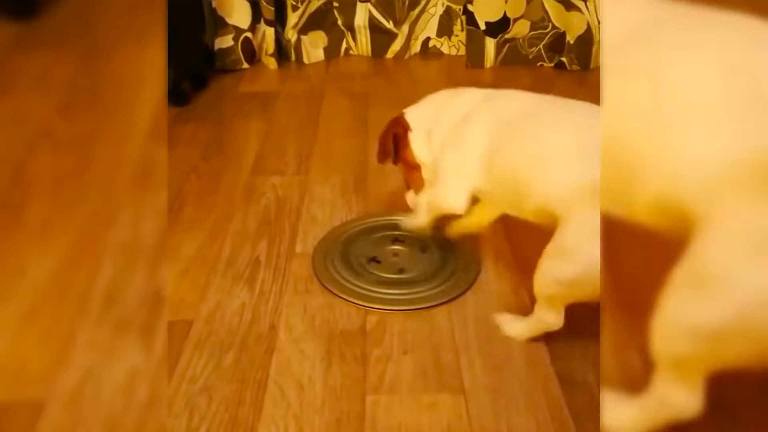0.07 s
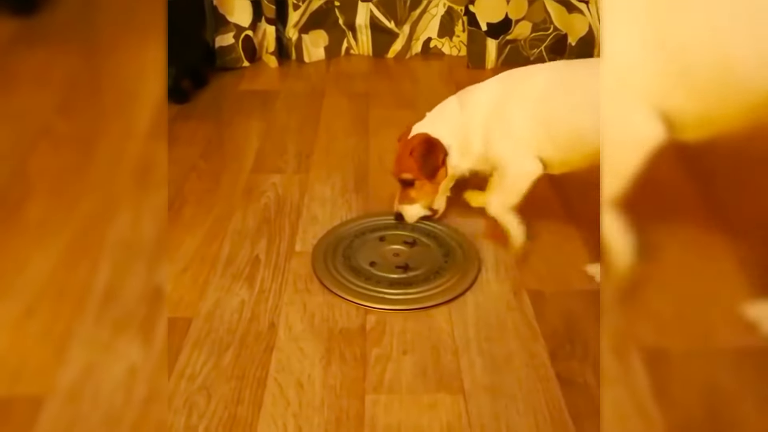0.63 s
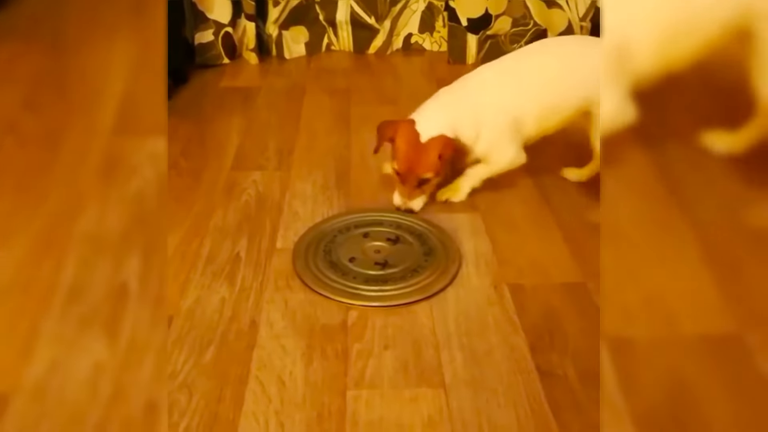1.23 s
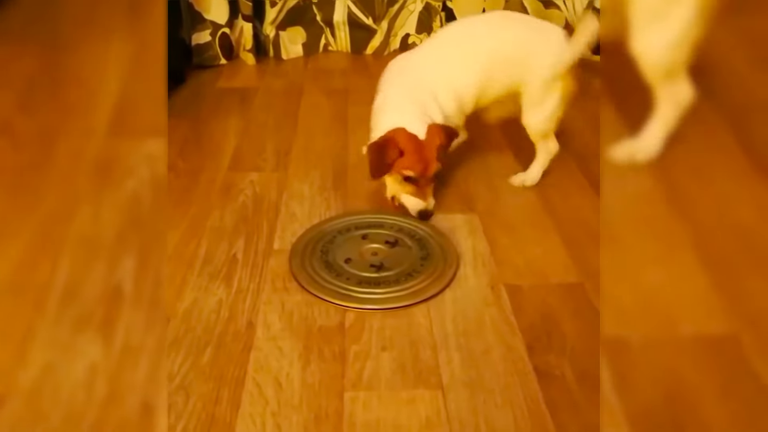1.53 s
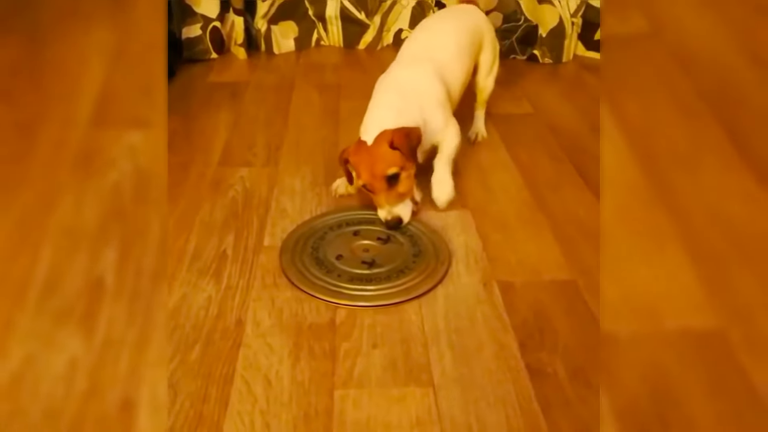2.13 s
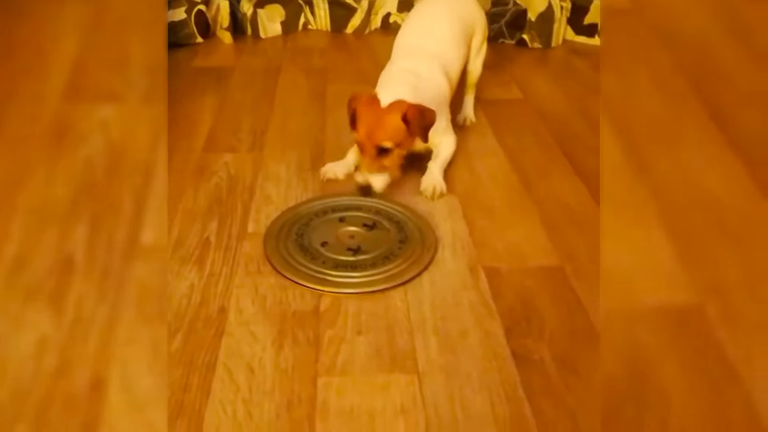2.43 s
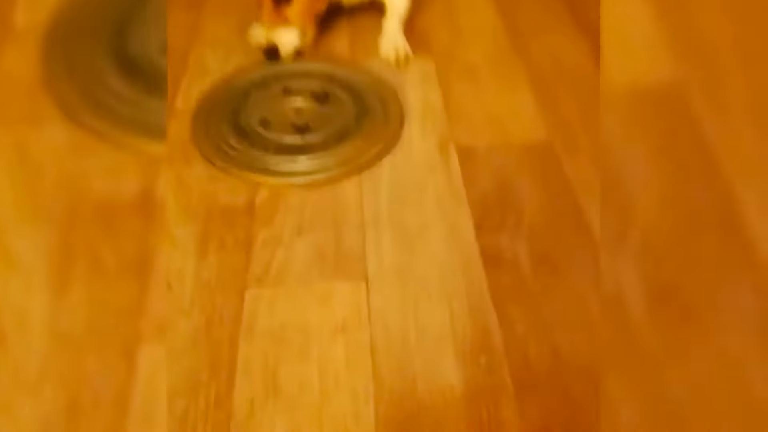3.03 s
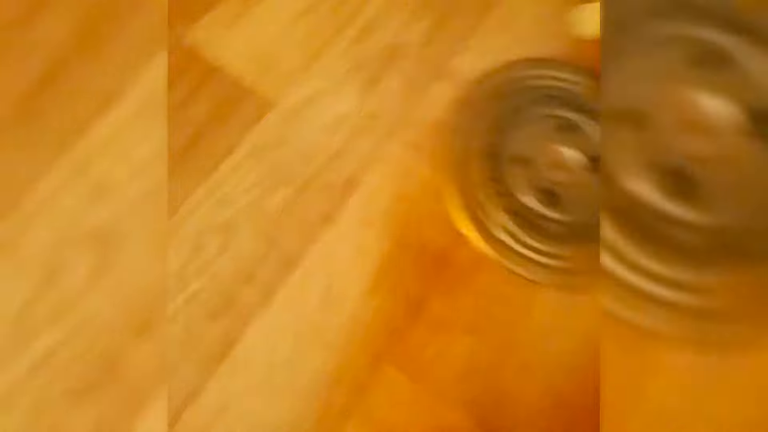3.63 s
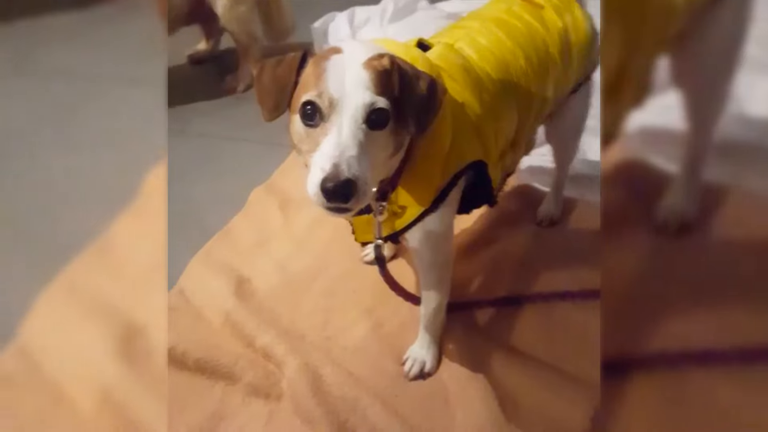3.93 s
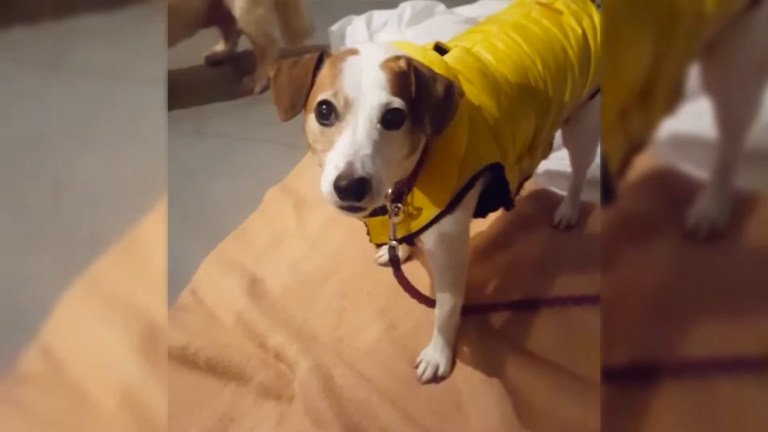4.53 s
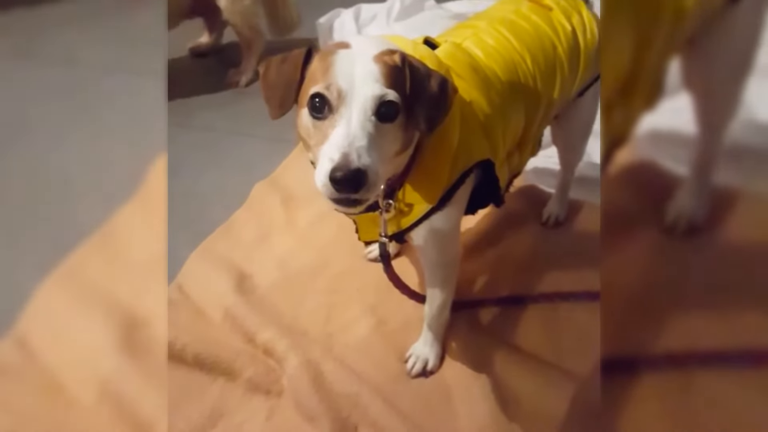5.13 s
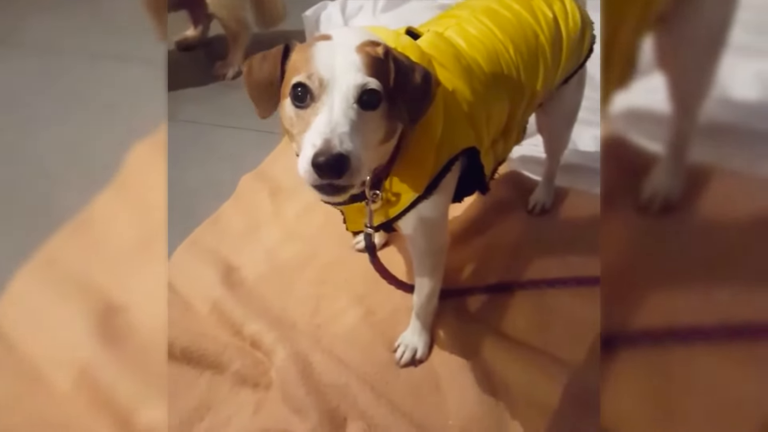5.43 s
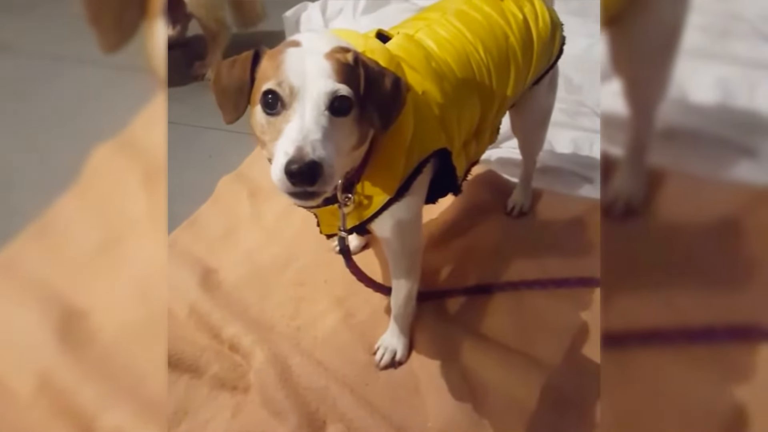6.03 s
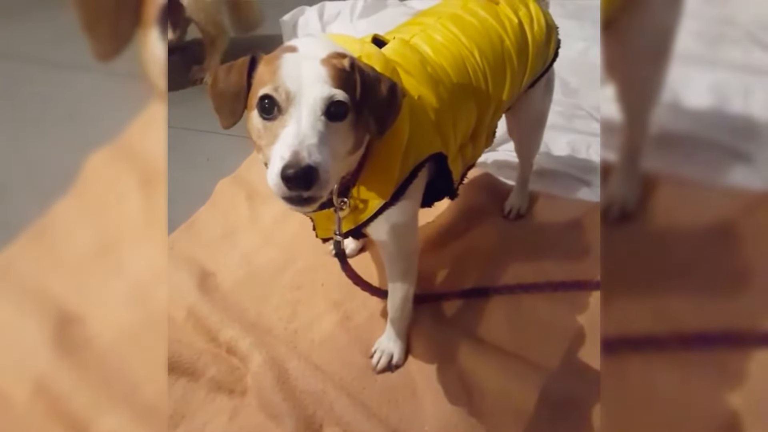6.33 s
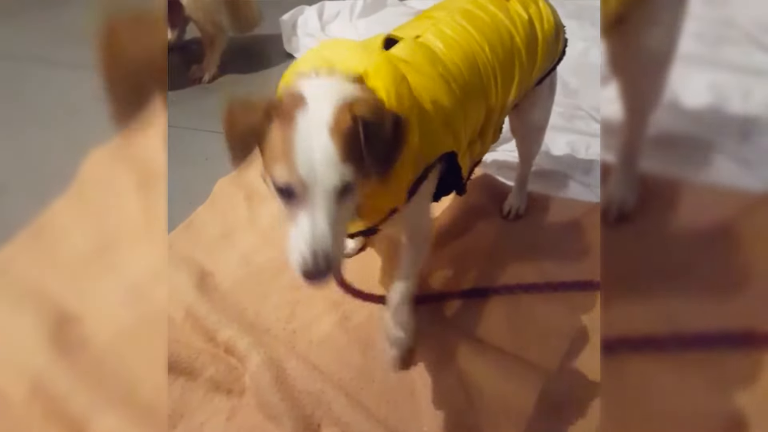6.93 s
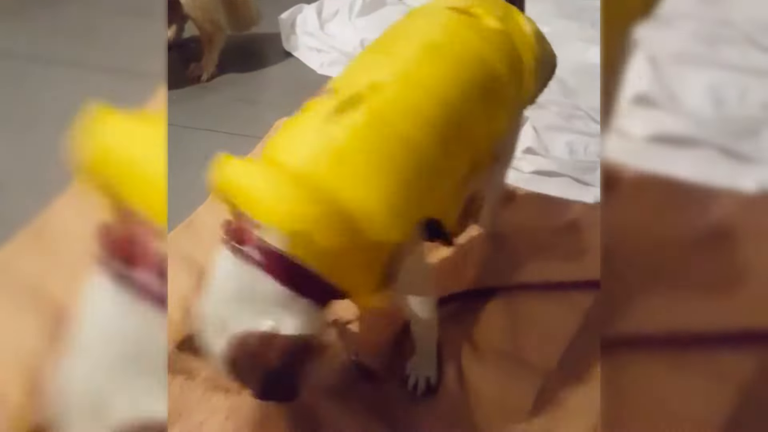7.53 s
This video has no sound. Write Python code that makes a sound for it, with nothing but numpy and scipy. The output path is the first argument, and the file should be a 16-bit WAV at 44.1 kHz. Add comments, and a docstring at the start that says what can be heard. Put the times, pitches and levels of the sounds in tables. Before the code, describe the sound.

In a slightly echoing room, a small dog's claws tick on a hard floor as it growls and gives five sharp, squealing barks. A brief clatter of knocks and a low muttering growl follow. After a short silence, a second dog, close to the microphone and louder, gives one shrill yap, two woofs and a rattling growl, then sneezes, making its metal collar fittings clink.

```python
"""Claws tick on the hard floor of a live room as a terrier circles a metal lid, growling and yapping.
After a short silence a second dog is heard close by: one shrill yap, two woofs, a rattling growl,
then a sneeze that shakes the metal fittings of its collar. Each voice is uneven vocal-fold pulses and
breath ringing in throat and mouth, with a clear note in the barks and the yap. The sneeze is air
bursting through the nose; lid and collar ring as decaying modes."""
import sys
import numpy as np
from scipy import signal
from scipy.fft import rfft, irfft
from scipy.io import wavfile
from scipy.ndimage import uniform_filter1d

SR = 44100
rng = np.random.default_rng(int(sys.argv[2]) if len(sys.argv) > 2 else 0)


def log_audio(samples):
    """Write samples as a 16-bit WAV file to the path given in sys.argv[1]."""
    # one column per channel
    frames = np.atleast_2d(samples).T
    # limit to full scale, then quantise
    limited = np.clip(frames, -1, 1)
    pcm = np.round(limited * 32767).astype(np.int16)
    wavfile.write(sys.argv[1], SR, pcm)


N = 342643
TIME = np.arange(N) / SR
SILENCE_S = 3.8   # the live room falls silent here


def from_db(db):
    """Decibels to gain."""
    return 10 ** (np.asarray(db) / 20)


def unit_power(x):
    """Scale to unit power."""
    return x / np.sqrt(np.mean(x ** 2) + 1e-20)


def follow(rows, t):
    """The columns of a curve table at times t."""
    seconds, *columns = np.transpose(rows)
    return [np.interp(t, seconds, column) for column in columns]


def span(start, end):
    """The sample times from start to end, in seconds."""
    return TIME[int(start * SR):int(end * SR)]


def gate(start, end, t=TIME, fade_s=0.0024):
    """Fade in after start and out before end."""
    return np.clip(np.minimum(t - start, end - t) / fade_s, 0, 1)


def place(x, start):
    """Lay a sound on the timeline."""
    return np.pad(x, (int(start * SR), N))[:N]


def band(x, hz, kind, order=2):
    """Butterworth filter."""
    sections = signal.butter(order, np.clip(hz, 10, .45 * SR), kind, fs=SR, output="sos")
    return signal.sosfilt(sections, x + 1e-18)


def wander(rate_hz, size=N):
    """Smooth random drift of unit power."""
    return unit_power(band(rng.standard_normal(size + SR // 4), rate_hz, "low")[SR // 4:])


def colour(x, spectrum, formants=(), size=4096):
    """Minimum-phase EQ: a broad curve with resonances on top."""
    hz = np.maximum(np.arange(size // 2 + 1) * SR / size, 1)
    points_hz, points_db = np.transpose(spectrum)
    db = np.interp(np.log(hz), np.log(points_hz), points_db)
    for centre, width, peak_db in formants:
        db = db + peak_db / (1 + (2 * (hz - centre) / width) ** 2)
    cepstrum = irfft(np.log(from_db(db)))[:size // 2]
    cepstrum[1:] *= 2
    impulse = irfft(np.exp(rfft(cepstrum, size)))[:size // 2]
    return signal.fftconvolve(x, impulse)[:len(x)]


def noise(spectrum):
    """Coloured noise of unit power."""
    return unit_power(colour(rng.standard_normal(N), spectrum))


def dying_noise(t60):
    """White noise that falls 60 dB in t60 seconds."""
    t = np.arange(int(max(t60, .002) * 1.5 * SR)) / SR
    return rng.standard_normal(len(t)) * from_db(-60 * t / t60)


def clicks(rows):
    """One impulse for each pair of seconds and dB."""
    out = np.zeros(N)
    for start, db in rows:
        out[int(start * SR)] += from_db(db)
    return out


def ring(x, hz, t60):
    """One mode: a click starts a decaying cosine."""
    radius = from_db(-60 / (t60 * SR))
    feedback = radius * np.cos(2 * np.pi * hz / SR)
    return signal.lfilter([1, -feedback], [1, -2 * feedback, radius ** 2], x + 1e-18)


def burst(start, length, db, sag_db_per_s, attack_s=0.00753, release_s=0.018):
    """Envelope of a push of air: quick attack, a hold that sags, release."""
    age = np.maximum(TIME - start, 0)
    edges = np.clip(np.minimum(age / attack_s, (length - age) / release_s + 1), 0, 1)
    return from_db(db - sag_db_per_s * np.minimum(age, length)) * edges


def unsteady_phase(hz, flutter, rate_hz):
    """Phase of a pitch that flutters by a share of itself."""
    return 2 * np.pi * np.cumsum(hz * (1 + flutter * wander(rate_hz, len(hz)))) / SR


def tone(hz, levels_db, flutter):
    """A clear voice; fast flutter frays its upper harmonics."""
    phase = unsteady_phase(hz, flutter, rate_hz=403)
    return np.sqrt(2) * sum(from_db(db) * np.sin(k * phase) for k, db in enumerate(levels_db, 1))


def even(x, pitch, cycles=2.8):
    """Hold the power steady over a few cycles of the lowest pitch."""
    size = int(max(cycles / pitch.min(), .008) * SR)
    power = np.abs(uniform_filter1d(uniform_filter1d(x ** 2, size), size))
    return x / np.sqrt(power + 1e-6 * np.mean(x ** 2))


def vocal_folds(t, pitch, rough, jitter, closure_hz=12000, shimmer_db=6, rasp=1.0, restarts=()):
    """Each closure is a pulse of uneven timing and strength; the folds also chop the breath."""
    cycle = np.cumsum(pitch * np.exp(jitter * rough * wander(220, len(t)))) / SR
    for i in np.searchsorted(t, restarts):   # the folds snap as soon as a catch lets go
        cycle[i:] += np.ceil(cycle[i]) - cycle[i]
    closures = np.interp(np.arange(1, int(cycle[-1])), cycle, np.arange(len(t)))
    at, late = closures.astype(int), closures % 1
    strength = from_db(shimmer_db * rough[at] * rng.standard_normal(len(at))) * np.sqrt(SR / pitch[at])
    pulses = np.bincount(at, strength * (1 - late), len(t))
    pulses += np.bincount(at + 1, strength * late, len(t))
    pulses = band(pulses - np.sqrt(pitch / SR), closure_hz, "low")   # slack folds close softly
    breath = unit_power(np.exp(-3 * (cycle % 1)) * rng.standard_normal(len(t)))
    return band(pulses + rasp * rough * breath, 70, "high")


def voice_bands(x, pitch, throat_db, chest_db, edge_db):
    """Ride three bands of a voice: throat mids, chest hum and open-mouth edge."""
    too_high = np.clip(np.log2(pitch / 460), 0, 1)   # above 460 Hz the voice leaves the chest
    throat = from_db(throat_db) * even(band(x, [500, 1150], "band", order=3), pitch)
    chest = from_db(chest_db - 38 * too_high) * even(band(x, 490, "low", order=6), pitch)
    edge = from_db(edge_db) * even(band(x, 1160, "high", order=7), pitch)
    return throat + chest + edge


def moving_mouth(x, rows, width_hz, lift_db, block=64):
    """Lift resonances that glide as the lips move."""
    out, radius = x.copy(), np.exp(-np.pi * width_hz / SR)
    starts = np.arange(int(rows[0][0] * SR), int(rows[-1][0] * SR), block)
    for track in follow(rows, starts / SR):
        state = np.zeros(2)
        for i, hz in zip(starts, track):
            poles = [1, -2 * radius * np.cos(2 * np.pi * hz / SR), radius ** 2]
            rung, state = signal.lfilter([1, 0, -1], poles, x[i:i + block], zi=state)
            out[i:i + block] += from_db(lift_db) * (1 - radius ** 2) / 2 * rung
    return out


def utter(phrase, effort, shape, formants, throat_db, chest_db, edge_db, chest_follows, edge_follows,
          edge_db_per_octave=0, **texture):
    """One effort drives the throat; chest and edge follow its swing, and edge may rise with pitch."""
    start, end = phrase[0][0], phrase[-1][0]
    t = span(start, end)
    pitch, rough = follow(phrase, t)
    level, = follow(effort, t)
    swing = level - level.mean()
    edge = edge_db + edge_follows * swing + edge_db_per_octave * np.log2(pitch / pitch.mean())
    sound = colour(vocal_folds(t, pitch, rough, **texture), shape, formants)
    sound = voice_bands(sound, pitch, throat_db + swing, chest_db + chest_follows * swing, edge)
    return place(from_db(level.mean()) * sound * gate(start, end, t), start)


# Room tone EQ. Each row: frequency in Hz, gain in dB.
AIR_EQ = [(15, -38), (25, -3.5), (53, -11), (108, -4), (225, -8), (285, -15.5), (342, -14), (1080, -24),
          (1480, -25.5), (3420, -29.5), (13000, -43.5)]
# Its fader ride. Each row: time in seconds, level in dB.
AIR_RIDE = [(0, -80.5), (3.78, -75), (3.83, -110), (4.12, -110), (4.2, -72.5), (4.5, -63), (5.2, -68),
            (5.6, -66.5), (6.8, -63), (7.77, -57.5)]


def room_tone(side_db=-6, hum_hz=103.5, hum_db=2.5):
    """A bed of room air, joined by low mains hum after the silence."""
    hum = from_db(hum_db) * (TIME > SILENCE_S) * np.sin(2 * np.pi * hum_hz * TIME)
    mid = noise(AIR_EQ) + hum
    side = from_db(side_db) * noise(AIR_EQ) * [[1], [-1]]
    return from_db(follow(AIR_RIDE, TIME)[0]) * (mid + side)


# Claw hits. Each row: start in seconds, relative level in dB.
CLAW_HITS = [(0.0184, -24), (0.0354, -21.5), (0.0588, -25.5), (0.1416, -25), (0.177, -26.5),
             (0.3466, -18.5), (0.5242, -24.5), (0.5394, -38), (0.8051, -30)]
# Their EQ. Each row: frequency in Hz, gain in dB.
CLAW_EQ = [(290, -50.5), (500, -23), (732, 7), (1100, -6.5), (1350, -6), (2430, -14.5), (3280, -0.5),
           (5430, 4.5), (13000, -16.5)]


def claws(level_db=8, t60=0.031):
    """Each claw scratches the floor for an instant."""
    scratch = dying_noise(t60)
    steps = signal.fftconvolve(clicks(CLAW_HITS), scratch / np.linalg.norm(scratch))[:N]
    return from_db(level_db) * colour(steps, CLAW_EQ)


# The opening growl. Each row: time in seconds, pitch in Hz, roughness from 0 to 1.
GRUMBLE_PITCH = [(.235, 119.9, 0.67), (.35, 139.3, 0.65), (.45, 114.8, .6), (.63, 104.1, 0.52)]
# The push behind it. Each row: time in seconds, level in dB.
GRUMBLE_EFFORT = [(0.235, -67), (0.267, -47), (0.329, -42.5), (0.521, -58.5), (0.573, -49.5), (0.63, -73)]
# Closed lips, for grumble and mutter. Each row: frequency in Hz, gain in dB.
LIPS_CLOSED = [(53, -68), (90, -19), (179, 2), (334, -4), (476, -22), (736, -2.5), (869, 0.5), (1070, -11),
               (2310, -24.5), (2620, -16.5), (3730, -24), (4990, -21), (6960, -25.5), (9510, -21.5),
               (13000, -32.5)]
# Their resonances. Each row: centre in Hz, width in Hz, gain in dB.
GROWL_FORMANTS = [(225, 160, 4), (840, 94, -2), (1883, 93, 7), (2780, 130, 3), (4200, 410, -4.5),
                  (5100, 620, 4.5)]


def grumble():
    """A low, breathy growl behind closed lips."""
    return utter(GRUMBLE_PITCH, GRUMBLE_EFFORT, LIPS_CLOSED, GROWL_FORMANTS,
                 throat_db=4.5, chest_db=-7, edge_db=-7.5, chest_follows=0.42, edge_follows=0.61,
                 jitter=0.28, shimmer_db=9, rasp=2.2)


# The barks. Each row: start, peak, end and length of the break in seconds; starting, top and end
# pitch in Hz; three mouth resonances and a notch in Hz; throat, chest and edge levels in dB.
BARKS = [(.808, 0.953, 1.025, 0.048, 215.4, 439.3, 230.6, 1900, 3050, 5130, 2450, -29, -52.5, -31),
         (1.063, 1.201, 1.255, 0.064, 215.7, 400.7, 261, 1664, 3390, 4120, 3600, -35, -49.5, -28.5),
         (1.56, 1.652, 1.715, 0.054, 239.3, 452.6, 231, 1760, 2790, 4240, 3680, -31, -53, -32),
         (2.298, 2.386, 2.46, .045, 286, 449.7, 300.3, 1840, 3180, 5090, 4100, -32, -54, -32),
         (2.819, 2.914, 3.0, 0.05, 199.7, 411.7, 319.5, 1674, 2800, 4200, 3960, -36, -50.5, -26)]
# Two mouth shapes for them. Each row: frequency in Hz, gain in dB.
TEETH_BARED = [(71, -66.5), (120, -30), (339, -14), (397, -33), (554, -20), (773, 2.5), (904, 0),
               (1040, -4), (1360, -9), (2300, -14), (2820, -9.5), (3640, -19.5), (5600, -13), (6400, -20),
               (9000, -27.5), (13000, -38)]
LIPS_DRAWN = [(120, -64), (200, -28.5), (455, -36), (754, -15), (963, -24), (1500, -12), (2150, -21),
              (2840, -14), (3700, -20), (4330, -9.5), (5100, -9.5), (5700, -14), (6580, -26),
              (10200, -33.5), (13000, -69)]
SNARL_HZ = 90   # loose throat tissue makes the barks rattle


def bark(row, shape, flip_s=0.007, snarl_db=3, **texture):
    """The pitch climbs as the mouth opens; the voice thins at the break and drops to a hoarse tail."""
    start, peak, end, break_s, start_hz, top_hz, end_hz = row[:7]
    *mouth_hz, notch_hz, throat_db, chest_db, edge_db = row[7:]
    t = span(start, end)
    breaks, drops = peak - break_s / 2, peak + break_s / 2
    climb = np.sin(np.pi / 2 * np.clip((t - start) / (.87 * (breaks - start)), 0, 1))
    squealing = np.clip(np.minimum(t - breaks, drops - t) / flip_s + .5, 0, 1)
    tail = np.interp(t, [drops, end], [0, 1])
    pitch = (start_hz + (top_hz - start_hz) * climb) * (end_hz / top_hz) ** tail
    rough = np.interp(t, [start, (start + breaks) / 2, breaks - 2 * flip_s, breaks, drops],
                      [.5, .13, .13, .45, .65])
    throat = throat_db - 16.5 * (1 - climb) - 13 * squealing - 19 * tail
    # opening jaws let the treble out, lose the chest hum and raise the mouth resonances
    still_shut = np.interp(t, [start, peak - 0.015], [1, 0]) ** 1.15
    closing = np.interp(t, [peak, peak + 0.076], [0, 1])
    edge = edge_db - 39 * still_shut - 19.5 * closing
    chest = chest_db - 13.5 * np.interp(t, [start, breaks, peak, drops + flip_s], [0, 0.42, 1, 0])
    shut_hz = .86 * np.array(mouth_hz)
    jaws = [(0, *shut_hz), (breaks - start, *mouth_hz), (drops - start, *mouth_hz),
            ((len(t) - 1) / SR, *shut_hz)]
    sound = colour(vocal_folds(t, pitch, rough, **texture), shape, [(notch_hz, 380, -17.5)])
    sound = moving_mouth(sound, jaws, width_hz=160, lift_db=12)
    sound = voice_bands(sound, pitch, throat, chest, edge)
    sound *= from_db(snarl_db * wander(SNARL_HZ, len(t)))
    return place(sound * gate(start, end, t, fade_s=0.013), start)


def barks():
    """Four barks through bared teeth, then one with the lips drawn back."""
    bared = sum(bark(row, TEETH_BARED, jitter=.17, shimmer_db=8, rasp=0.64, closure_hz=8900)
                for row in BARKS[:-1])
    return bared + bark(BARKS[-1], LIPS_DRAWN, jitter=.16, shimmer_db=11, rasp=0.52, closure_hz=6500)


# The clear note, one curve a bark. Each row: time in seconds, pitch in Hz, level in dB.
SQUEAL_CURVES = [
    [(.83, 690, -50), (.862, 720, -39), (.885, 870, -31), (.905, 890, -30), (.92, 790, -28),
     (.945, 790, -29), (.96, 740, -40), (.977, 800, -30), (1.025, 700, -41)],
    [(1.085, 690, -46), (1.12, 620, -37), (1.16, 740, -37), (1.178, 812, -37), (1.2, 822, -37),
     (1.215, 680, -38), (1.24, 640, -42)],
    [(1.572, 680, -45), (1.595, 880, -29), (1.622, 905, -25), (1.632, 1170, -30), (1.646, 1390, -25),
     (1.661, 1400, -24), (1.675, 1150, -31), (1.688, 800, -28), (1.712, 660, -38)],
    [(2.3, 590, -45), (2.335, 790, -32), (2.36, 910, -26), (2.372, 1170, -29), (2.39, 1235, -26),
     (2.405, 1120, -36), (2.418, 900, -37), (2.428, 750, -30), (2.455, 640, -42)],
    [(2.83, 620, -43), (2.855, 780, -31), (2.878, 810, -37), (2.89, 1260, -32), (2.91, 1410, -33),
     (2.922, 1650, -22), (2.937, 1180, -30), (2.952, 730, -29), (3.0, 660, -38)],
]
# Its bite at each bark's peak. Each row: harmonics 2, 3 and 4 in dB relative to the note.
SQUEAL_OVERTONES = [(-7.5, -14.5, -12), (11, -14, -3), (-6, -20.5, -18.5), (-7, -22.5, -20.5),
                    (-6.5, -9, -29)]


def squeals(dull_db=15, dull_s=0.054, snarl_db=1.5):
    """The clear note of each bark lunges up, turns shrill at the peak and falls away."""
    out = np.zeros(N)
    for curve, overtones, (_, peak, *_) in zip(SQUEAL_CURVES, SQUEAL_OVERTONES, BARKS):
        start, end = curve[0][0], curve[-1][0]
        t = span(start, end)
        hz, db = follow(curve, t)
        dull = dull_db * np.minimum(((t - peak) / dull_s) ** 2, 1)
        sound = tone(hz, [db] + [db + over - dull for over in overtones], flutter=0.014)
        sound *= from_db(snarl_db * wander(SNARL_HZ, len(t)))
        out += place(sound * gate(start, end, t, fade_s=.005), start)
    return out


def lid(voice):
    """The thin metal faintly takes up one note of the voice and rings on."""
    return from_db(-77) * ring(voice, hz=1640, t60=.75)


# The drone. Each row: time in seconds, pitch in Hz, roughness from 0 to 1.
DRONE_PITCH = [(1.758, 188.6, 0.53), (1.84, 231.5, 0.32), (1.88, 312.8, 0.16), (1.92, 320.9, 0.49),
               (1.96, 235.2, 0.36), (2.1, 236.5, 0.32), (2.15, 221.5, 0.26), (2.22, 246, 0.1),
               (2.27, 262, 0.16), (2.302, 291, 0.12)]
# The push behind it. Each row: time in seconds, level in dB.
DRONE_EFFORT = [(1.758, -59.5), (1.827, -51), (1.886, -34), (1.94, -55), (1.966, -43.5), (2.29, -42.5),
                (2.3, -35)]
# Nasal EQ. Each row: frequency in Hz, gain in dB.
THROUGH_NOSE = [(71, -98), (120, -51), (225, -4), (389, -30), (623, -11.5), (819, -4), (904, -0.5),
                (1060, -8), (1830, -22), (2320, -22.5), (5070, -27), (5930, -39), (13000, -40.5)]
# Nasal resonances. Each row: centre in Hz, width in Hz, gain in dB.
NOSE_FORMANTS = [(980, 170, 5.6), (1830, 93, 14), (3937, 86, 13), (5130, 670, 16.3)]


def drone():
    """Between two barks the voice keeps going through the nose."""
    return utter(DRONE_PITCH, DRONE_EFFORT, THROUGH_NOSE, NOSE_FORMANTS,
                 throat_db=4, chest_db=-11, edge_db=-2.5, chest_follows=0.076, edge_follows=0.54,
                 closure_hz=3980, jitter=.22, shimmer_db=11)


# Dull bumps. Each row: start in seconds, relative level in dB.
MIC_BUMPS = [(2.934, -35), (2.984, -44.5), (3.02, -38.5), (3.198, -45)]


def bumps():
    """Soft bumps on the microphone ring in the low bass."""
    return from_db(-5) * band(ring(clicks(MIC_BUMPS), hz=45, t60=0.16), 260, "low")


# Hard knocks. Each row: start in seconds, peak on the right in dB, brightness in Hz.
KNOCKS = [(3.1877, -29.5, 2900), (3.2029, -33, 2260), (3.2283, -31, 4200), (3.2403, -19.5, 6100),
          (3.2486, -15.5, 2950), (3.2526, -26, 4000), (3.2534, -22, 6500), (3.263, -27.5, 8900),
          (3.266, -27.5, 3000)]
# The scuff's EQ. Each row: frequency in Hz, gain in dB.
SCUFF_EQ = [(200, -6), (1500, -5), (4500, -3), (7200, 2), (8300, -11), (10000, -2), (13000, -5)]


def clatter(left_db=-15, low_cut_hz=120):
    """A run of hard, dry knocks close on the right, ending in a short scuff."""
    scuff = burst(start=3.258, length=.033, db=-43, sag_db_per_s=120, attack_s=0.0019, release_s=0.0058)
    out = scuff * noise(SCUFF_EQ)
    for start, db, hz in KNOCKS:
        knock = band(signal.unit_impulse(SR // 50), hz, "low", order=3)
        knock = band(knock, low_cut_hz, "high")
        out += place(from_db(db) * knock / np.abs(knock).max(), start)
    return from_db([[left_db], [0]]) * out


# The mutter. Each row: time in seconds, pitch in Hz, roughness from 0 to 1.
MUTTER_PITCH = [(3.355, 109.4, 0.55), (3.44, 174.7, 0.49), (3.53, 129.4, 0.59), (3.62, 134.9, 0.67),
                (3.69, 174.5, 0.478), (3.8, 140.9, 0.5)]
# The push behind it. Each row: time in seconds, level in dB.
MUTTER_EFFORT = [(3.354, -63), (3.394, -63), (3.402, -43), (3.448, -42.5), (3.505, -52), (3.55, -49),
                 (3.63, -49), (3.69, -39), (3.74, -49), (3.8, -57)]
# Its mouth sweep. Each row: time in seconds, two resonances in Hz.
MUTTER_MOUTH = [(3.36, 2730, 5260), (3.41, 2660, 3650), (3.45, 1940, 3430), (3.49, 2450, 3380),
                (3.54, 2700, 4540), (3.61, 2760, 4648), (3.68, 2170, 4800), (3.72, 2140, 5840),
                (3.79, 1648, 5150)]


def mutter():
    """A low growl whose resonances slide with the lips."""
    growl = utter(MUTTER_PITCH, MUTTER_EFFORT, LIPS_CLOSED, GROWL_FORMANTS,
                  throat_db=0.5, chest_db=-3, edge_db=-8.5, chest_follows=0.56, edge_follows=0.53,
                  jitter=0.25, shimmer_db=10)
    return moving_mouth(growl, MUTTER_MOUTH, width_hz=200, lift_db=10)


# Small close knocks and mouth clicks. Each row: start in seconds, relative peak in dB, brightness in Hz.
CLOSE_TICKS = [(4.604, -34.5, 1060), (4.625, -25, 1284), (5.307, -41, 1290), (6.54, -24, 819),
               (6.659, -27.5, 1514), (6.878, -44.5, 1350), (6.932, -45, 2190), (7.077, -38.5, 1063),
               (7.228, -40, 1190), (7.277, -45, 5000), (7.369, -47.5, 3610), (7.42, -35.5, 2740)]


def ticks(level_db=-1, crack=5, t60=0.028):
    """A crack and a short dry rattle around one broad resonance."""
    out = np.zeros(N)
    for start, db, hz in CLOSE_TICKS:
        tick = dying_noise(t60)
        tick[0] += crack
        tick = band(tick, [hz / 2.8, hz * 1.1], "band", order=1)
        out += place(from_db(db + level_db) * tick / np.abs(tick).max(), start)
    return out


# A breath in before the yap, then a puff and a nostril hiss as the rattling growl ends.
# Each row: start and length in seconds, level in dB, sag in dB per second.
HUFFS = [(4.621, 0.12, -45, 9), (6.538, 0.12, -44, 50)]
NOSE_HISS = [(6.515, 0.047, -42, 30)]
# Their EQs. Each row: frequency in Hz, gain in dB.
HUFF_EQ = [(240, -33.5), (400, -8), (1640, -6), (2300, -3.5), (4000, -11.5), (4900, -7.5), (5920, -33.5),
           (9860, -18.5), (13000, -32)]
NOSE_HISS_EQ = [(5500, -40), (7200, -7), (8300, -7), (9400, -2), (11500, -6), (12500, -21)]


def huffs(grain_db=3, grain_hz=99):
    """Air flutters through the second dog's muzzle and hisses thinly from the nostrils."""
    puffs = sum(burst(*row) for row in HUFFS) * noise(HUFF_EQ)
    hiss = sum(burst(*row) for row in NOSE_HISS) * noise(NOSE_HISS_EQ)
    return (puffs + hiss) * from_db(grain_db * wander(grain_hz))


# The shrill yap. Each row: time in seconds, pitch in Hz, roughness from 0 to 1.
YAP_PITCH = [(4.789, 1033, 0.27), (4.795, 938, .3), (4.806, 897.3, 0.15), (4.823, 917.7, 0.18),
             (4.832, 879.3, 0.41), (4.839, 836.3, 0.44), (4.844, 727.6, 0.57), (4.851, 617.7, 0.4),
             (4.862, 534, 0.55), (4.873, 465.6, 0.41), (4.884, 422, 0.53), (4.896, 404, 0.5),
             (4.908, 300, 0.71)]
# The push behind it. Each row: time in seconds, level in dB.
YAP_EFFORT = [(4.79, -34), (4.8, -43), (4.827, -37), (4.841, -18), (4.859, -18), (4.88, -17.5),
              (4.894, -20), (4.909, -30)]
# A wide-open mouth. Each row: frequency in Hz, gain in dB.
WIDE_OPEN = [(59, -76), (100, -41.5), (480, -17.5), (736, -15), (884, -5), (1500, -30), (1800, -21),
             (3120, -30), (4510, -37.5), (5640, -59.5), (6600, -60), (7500, -47), (11700, -43),
             (13000, -76.5)]
# Its resonances. Each row: centre in Hz, width in Hz, gain in dB.
YAP_FORMANTS = [(862, 130, 6.5), (1804, 210, 0.8), (2550, 490, 3), (3250, 300, 2), (4040, 294, -12),
                (4580, 300, 5), (4900, 250, -6)]
# The clear core. Each row: time in seconds, level in dB, roll-off in dB per harmonic.
YAP_CORE = [(4.789, -15, 9.2), (4.796, -8.5, 9.7), (4.81, -8, 9), (4.828, -8, 8.6), (4.839, -16.5, 3.4),
            (4.845, -14.5, 8), (4.853, -19, 5), (4.866, -23.5, 6), (4.882, -32.5, 4)]


def yap(harmonics=4):
    """A rough voice around a clear core that holds, turns brassy as it breaks, and plunges."""
    grit = utter(YAP_PITCH, YAP_EFFORT, WIDE_OPEN, YAP_FORMANTS,
                 throat_db=0.5, chest_db=-18.5, edge_db=-4.5, chest_follows=1, edge_follows=1,
                 closure_hz=5530, shimmer_db=3, jitter=0.097)
    grit = signal.lfilter([.64, -1.58, 1], [1, -1.58, .64], grit)   # an all-pass smears each pulse
    start, end = YAP_CORE[0][0], YAP_CORE[-1][0]
    t = span(start, end)
    db, roll_off = follow(YAP_CORE, t)
    pitch, _ = follow(YAP_PITCH, t)
    core = tone(pitch, [db - k * roll_off for k in range(harmonics)], flutter=0.012)
    return grit + place(core * gate(start, end, t), start)


# The two woofs. Each row: time in seconds, pitch in Hz, roughness from 0 to 1.
WOOF_PITCH = [(5.33, 425, 0.9), (5.345, 387, 0.49), (5.37, 450, 0.48), (5.4, 435, 0.37),
              (5.42, 364.3, 0.16), (5.445, 344.3, 0.48), (5.48, 320.4, 0.66)]
DEEP_WOOF_PITCH = [(5.773, 328.6, 0.42), (5.8, 382, 0.66), (5.82, 414, 0.32), (5.85, 392, 0.18),
                   (5.875, 362.7, 0.505), (5.915, 358.5, 1), (5.94, 104, 0.25)]
# The push behind them. Each row: time in seconds, level in dB.
WOOF_EFFORT = [(5.331, -37), (5.34, -25.5), (5.39, -25), (5.408, -30.5), (5.416, -20), (5.428, -19.5),
               (5.48, -38)]
DEEP_WOOF_EFFORT = [(5.773, -33), (5.797, -25.5), (5.806, -15.5), (5.828, -14), (5.842, -16),
                    (5.868, -17.5), (5.894, -22), (5.94, -34)]
# A rounded mouth. Each row: frequency in Hz, gain in dB.
ROUNDED = [(59, -64), (100, -20.5), (307, -18.5), (391, -17.5), (500, -14.5), (798, -3.5), (999, -19),
           (1630, -38.5), (2080, -32), (2650, -40), (2940, -38), (4240, -38), (6500, -54), (7200, -47.5),
           (13000, -50.5)]
# Its resonances. Each row: centre in Hz, width in Hz, gain in dB.
WOOF_FORMANTS = [(347, 53, 5.5), (755, 280, 0.8), (1310, 220, 4), (1737, 95, 6.5), (2060, 190, 6),
                 (2640, 150, -6), (2980, 260, 11.5), (3600, 200, -7.5), (4250, 380, 11.5),
                 (4710, 240, -9.5)]


def woofs():
    """Two woofs through a rounded mouth, the second with more chest."""
    first = utter(WOOF_PITCH, WOOF_EFFORT, ROUNDED, WOOF_FORMANTS,
                  throat_db=-0.4, chest_db=-14, edge_db=-12, chest_follows=0.66, edge_follows=0.75,
                  edge_db_per_octave=37, closure_hz=7000, jitter=0.078, rasp=0.23)
    second = utter(DEEP_WOOF_PITCH, DEEP_WOOF_EFFORT, ROUNDED, WOOF_FORMANTS,
                   throat_db=0, chest_db=-9, edge_db=-14, chest_follows=0.5, edge_follows=1.59,
                   closure_hz=6950, jitter=0.087, rasp=0.58)
    return first + second


def pop(start=5.7307, left_db=6, right_db=-23):
    """One sharp, dry pop on the left with a faint deep tail."""
    punch = ring(clicks([(start, -8.5)]), hz=108, t60=0.026)
    tail = ring(clicks([(start, -38)]), hz=24, t60=0.22)
    return from_db([[left_db], [right_db]]) * band(punch + tail, 3860, "low")


# The rattling growl. Each row: time in seconds, pitch in Hz, roughness from 0 to 1.
RATTLE_PITCH = [(5.93, 105, 0.38), (5.98, 84.2, 0.45), (6.04, 63.86, 0.24), (6.1, 83.7, 0.35),
                (6.3, 90.05, 0.34), (6.38, 116.6, 0.43), (6.5, 118.4, 0.42), (6.56, 110.7, 0.2),
                (6.67, 106.7, 0.093)]
# The push behind it. Each row: time in seconds, level in dB.
RATTLE_EFFORT = [(5.93, -28), (5.96, -40), (6.128, -40.5), (6.3, -35.5), (6.39, -29), (6.47, -30.5),
                 (6.512, -22.5), (6.586, -38.5), (6.638, -40), (6.67, -54)]
# A shut jaw. Each row: frequency in Hz, gain in dB.
JAW_SHUT = [(47, -56), (80, -28), (108, -1), (162, -10), (237, -3), (300, -10), (341, 2.5), (395, -15),
            (469, -11), (521, -26), (749, -9), (1390, -47.5), (7160, -45), (11200, -52), (13000, -52)]
# Its resonances. Each row: centre in Hz, width in Hz, gain in dB.
RATTLE_FORMANTS = [(361, 44, 7.4), (785, 300, 6), (1215, 240, 11.3), (2550, 540, 7.5), (4180, 610, 15.7),
                   (5900, 800, 10.5), (11100, 2300, 6.2)]
# Catches in the throat. Each row: start and end in seconds.
CATCHES = [(6.111, 6.132), (6.164, 6.181), (6.211, 6.222), (6.257, 6.269), (6.305, 6.318)]


def rattling_growl(lips_close_s=6.52, closing_s=0.025, muffled_hz=365):
    """A growl so slow that its pulses stand apart; it catches, then ends behind closed lips."""
    growl = utter(RATTLE_PITCH, RATTLE_EFFORT, JAW_SHUT, RATTLE_FORMANTS,
                  throat_db=-1.5, chest_db=-6.5, edge_db=-18.5, chest_follows=1, edge_follows=0.99,
                  closure_hz=1310, jitter=.13, rasp=1.86, restarts=[end for _, end in CATCHES])
    flow = 1 - sum(gate(start, end) for start, end in CATCHES)
    shut = np.clip((TIME - lips_close_s) / closing_s, 0, 1)
    return flow * ((1 - shut) * growl + shut * band(growl, muffled_hz, "low"))


# Grunts ending the growl and inside the sneeze. Each row: start and length in seconds, level in dB,
# sag in dB per second, starting and end pitch in Hz, relative level of the octave in dB.
GRUNTS = [(6.507, 0.13, -31.5, 36, 113, 106.6, -1.5), (7.446, 0.036, -26.5, 380, 222, 183.5, 2.5),
          (7.559, 0.07, -24.5, 205, 140, 117.7, -5.5)]


def grunts():
    """Voice through the nose: a wobbling, sinking fundamental and its octave."""
    out = np.zeros(N)
    for start, length, db, sag, start_hz, end_hz, octave_db in GRUNTS:
        hz = np.interp(TIME, [start, start + length], [start_hz, end_hz])
        phase = unsteady_phase(hz, flutter=0.0349, rate_hz=150)
        out += burst(start, length, db, sag) * (np.sin(phase) + from_db(octave_db) * np.cos(2 * phase))
    return out


# Lip chuffs. Each row: start and length in seconds, level in dB, sag in dB per second.
CHUFFS = [(6.522, 0.0053, -26, 500), (6.662, .014, -42.5, 200)]
# Their EQ. Each row: frequency in Hz, gain in dB.
CHUFF_EQ = [(400, -8), (900, -13), (1300, 1), (1800, -5), (2500, -1), (3200, -19), (4200, -11), (5300, -40)]


def chuffs():
    """Sharp puffs of air through the lips finish the growl."""
    return sum(burst(*row, attack_s=0.00088, release_s=0.013) for row in CHUFFS) * noise(CHUFF_EQ)


# Two nasal snorts. Each row: start and length in seconds, level in dB, sag in dB per second.
SNORTS = [(7.435, 0.097, -39.5, 20), (7.559, 0.12, -20.5, 211)]
# EQs of the sneeze's noise layers. Each row: frequency in Hz, gain in dB.
SNORT_EQ = [(35, -62), (60, -20), (134, -1), (393, -5), (440, -13.5), (538, -6), (824, -19.5),
            (1200, -16.5), (1560, -50), (2640, -120)]
SPRAY_EQ = [(410, -37), (700, -3.5), (821, -16), (1210, -9.5), (1480, -11.5), (2530, -5.5), (3110, -12),
            (4000, -7.5), (4900, -2.5), (6000, -18), (6880, -24), (7590, -14), (12300, -13), (13300, -37)]
SNEEZE_HISS_EQ = [(3000, -48), (7000, -30), (8000, -11), (10000, 3), (11000, -5), (12000, 7), (13300, -28)]
# The nostril whistle. Each row: time in seconds, pitch in Hz, level in dB.
WHISTLE = [(7.475, 2354, -52), (7.505, 2450, -37), (7.525, 2750, -30.5), (7.54, 2534, -25.5),
           (7.55, 2190, -22), (7.565, 2110, -44)]


def sneeze(peak_s=7.575, rise_db_per_s=187, fall_db_per_s=270):
    """Air bursts through the nose: low snorts, a swell of spray, a thin hiss and a rough whistle."""
    snorts = sum(burst(*row) for row in SNORTS) * noise(SNORT_EQ)
    spray_db = -27 - np.maximum(rise_db_per_s * (peak_s - TIME), fall_db_per_s * (TIME - peak_s))
    spray = from_db(spray_db + 2.9 * wander(140)) * gate(7.445, 7.69, fade_s=0.0077) * noise(SPRAY_EQ)
    hiss = burst(start=7.5, length=.085, db=-39, sag_db_per_s=-15) * noise(SNEEZE_HISS_EQ)
    hz, db = follow(WHISTLE, TIME)
    whistle = from_db(db) * np.sin(unsteady_phase(hz, flutter=0.0397, rate_hz=550))
    return snorts + spray + hiss + whistle * gate(WHISTLE[0][0], WHISTLE[-1][0])


# The collar fittings knock together. Each row: start in seconds, relative level in dB.
COLLAR_HITS = [(7.595, -25), (7.602, -21.5), (7.62, -48), (7.672, -40.5), (7.714, -43.5)]
# Their modes. Each row: frequency in Hz, relative level in dB, time to fall 60 dB in seconds.
COLLAR_MODES = [(3720, -10, 0.049), (4330, -5, 0.058), (4560, -8, 0.045), (4870, -8, .35),
                (5500, -19, 0.14), (6250, -6, 0.02), (10450, -12, 0.24), (11800, 1, 0.12), (11960, 2, 0.11)]


def collar(clink_db=-1, clink_t60=0.02, spread_db=2.5):
    """Each strike gives a bright clink and sets the metal ringing with new strengths."""
    clinks = signal.fftconvolve(clicks(COLLAR_HITS), dying_noise(clink_t60))[:N]
    out = from_db(clink_db) * band(clinks, [3200, 12500], "band")
    for hz, mode_db, t60 in COLLAR_MODES:
        strikes = [(start, db + mode_db + rng.normal(0, spread_db)) for start, db in COLLAR_HITS]
        out += ring(clicks(strikes), hz, t60)
    return out


def room(x, t60, wet_db, lag_s, wall_hz, gap_s, bass_hz):
    """Direct sound, reaching the sides lag_s apart, and a diffuse tail that both share in the bass."""
    shared = band(dying_noise(t60), bass_hz, "low")
    sides = []
    for delay in (max(-lag_s, 0), max(lag_s, 0)):
        tail = shared + band(dying_noise(t60), bass_hz, "high")
        tail = band(tail, wall_hz, "low", order=1)
        tail = np.pad(tail / np.linalg.norm(tail), (int(gap_s * SR), 0))
        direct = np.pad(x, (round(delay * SR), 0))[:N]
        sides.append(direct + from_db(wet_db) * signal.fftconvolve(x, tail)[:N])
    return np.array(sides)


# The first dog's treble is shaded on the right side. Each row: frequency in Hz, gain in dB.
RIGHT_SHADE = [(100, -1), (2900, 0.5), (3600, -17), (6500, -17), (11000, -1)]


def circling_dog():
    """Claws, voice and lid in the live room, brighter on the left, cut off at the silence."""
    voice = grumble() + barks() + squeals() + drone()
    left, right = room(claws() + voice + lid(voice),
                       t60=0.31, wet_db=-6.5, lag_s=0.00051, wall_hz=6780, gap_s=.004, bass_hz=357)
    left_presence = [(100, 1), (2900, -0.5), (4000, 4), (8000, 2), (12000, -1)]
    live = np.array([colour(left, left_presence), colour(right, RIGHT_SHADE)])
    live += room(mutter(), t60=0.25, wet_db=-0.5, lag_s=.0005, wall_hz=8700, gap_s=.004, bass_hz=341)
    last_bark = gate(2.7, 3.085, fade_s=0.11)
    live *= from_db(np.outer([1.5, -6.5], last_bark))   # it reaches mostly the left side
    return live * np.clip((SILENCE_S - TIME) / 0.01 + 1, 0, 1)


def scene():
    """The first dog in the live room, a silence, then a second dog close by and almost dry."""
    live = circling_dog()
    close = room(ticks() + huffs() + yap() + woofs() + rattling_growl() + chuffs(),
                 t60=0.31, wet_db=-13.5, lag_s=.00008, wall_hz=4980, gap_s=.008, bass_hz=300)
    nasal = room(grunts() + sneeze(),
                 t60=0.22, wet_db=-6.5, lag_s=0, wall_hz=6000, gap_s=0.004, bass_hz=504.6)
    metal = room(collar(), t60=0.23, wet_db=-4.5, lag_s=-.00002, wall_hz=12000, gap_s=.0033, bass_hz=500)
    return room_tone() + live + bumps() + clatter() + close + pop() + nasal + metal


def record(dry, ceiling=.98, cutoff_hz=13300):
    """Round off the loudest peaks and cut the top."""
    rounded = dry / (1 + (dry / ceiling) ** 8) ** (1 / 8)
    return signal.sosfilt(signal.ellip(10, .2, 80, cutoff_hz, fs=SR, output="sos"), rounded)


dry = scene()
out = record(dry)
log_audio(out)
```